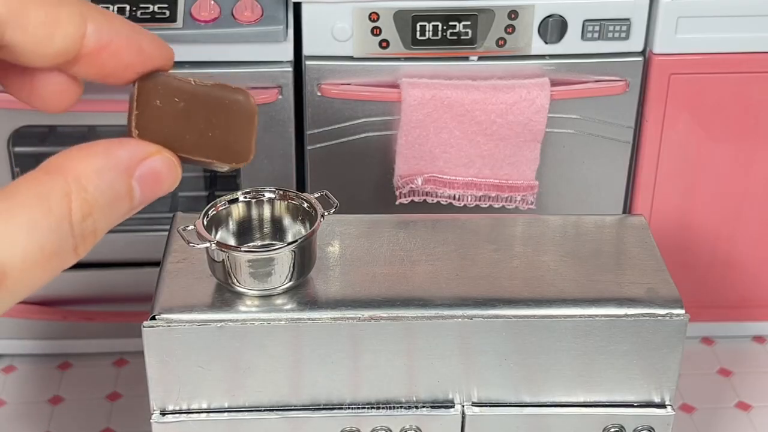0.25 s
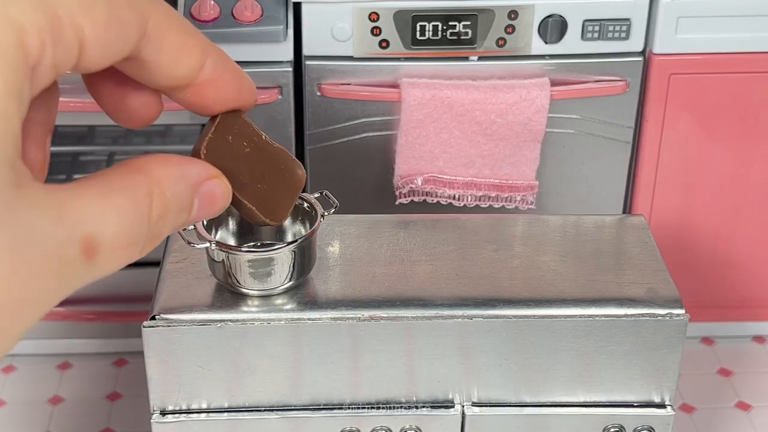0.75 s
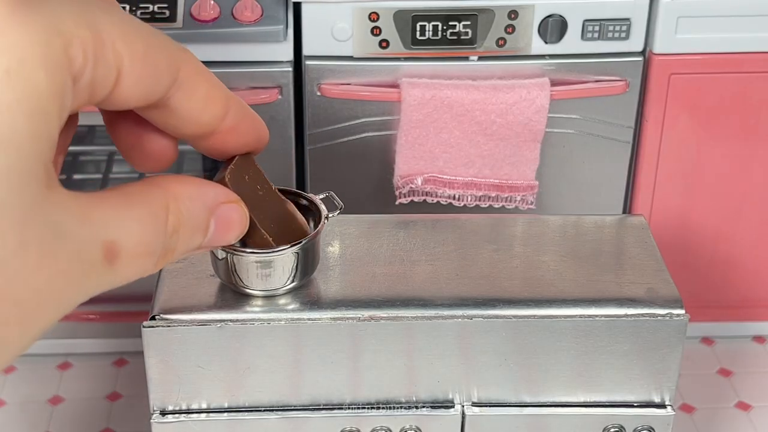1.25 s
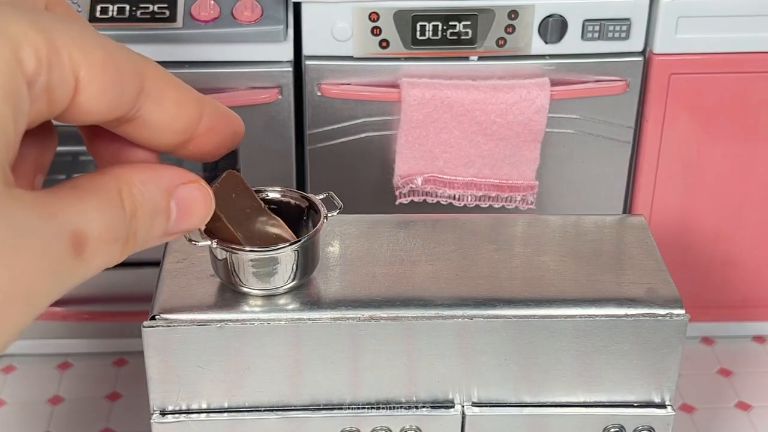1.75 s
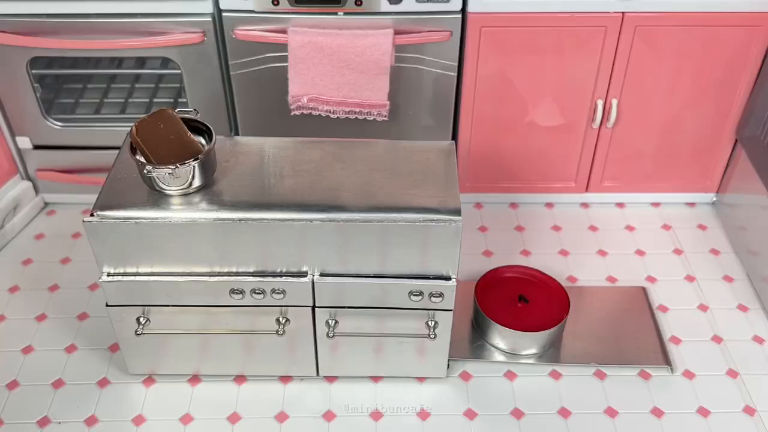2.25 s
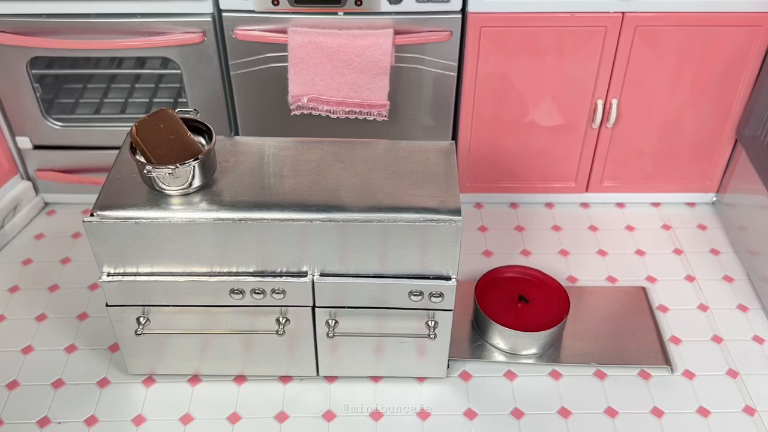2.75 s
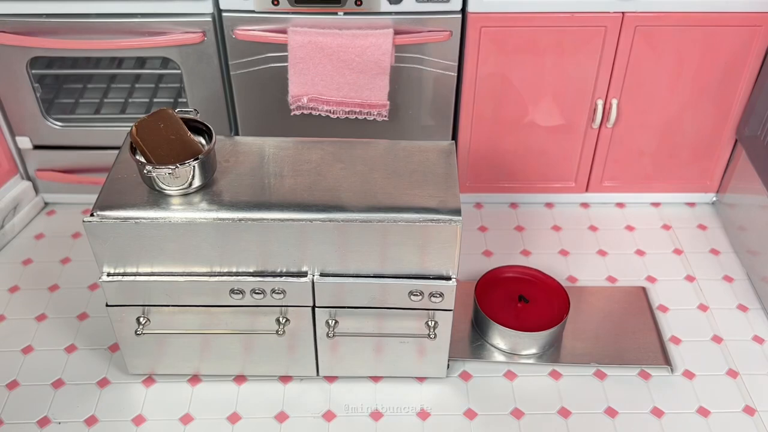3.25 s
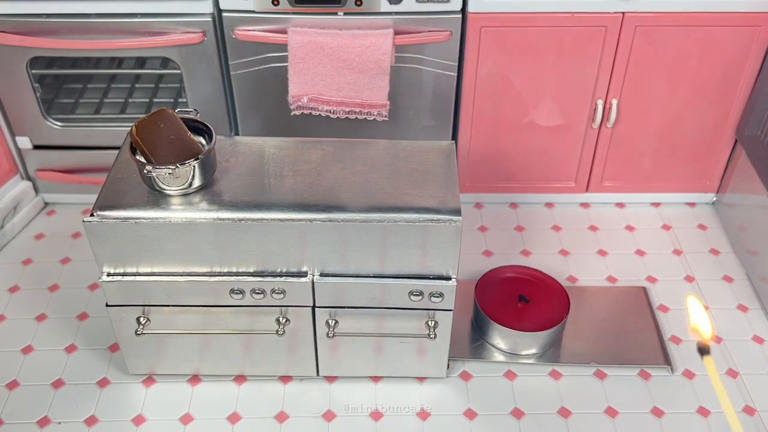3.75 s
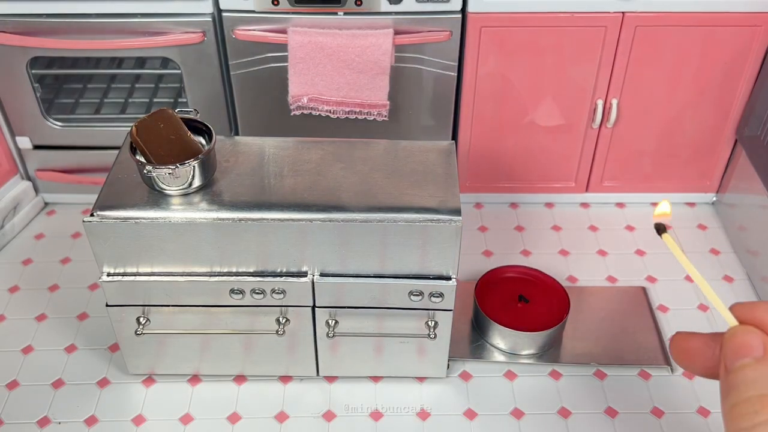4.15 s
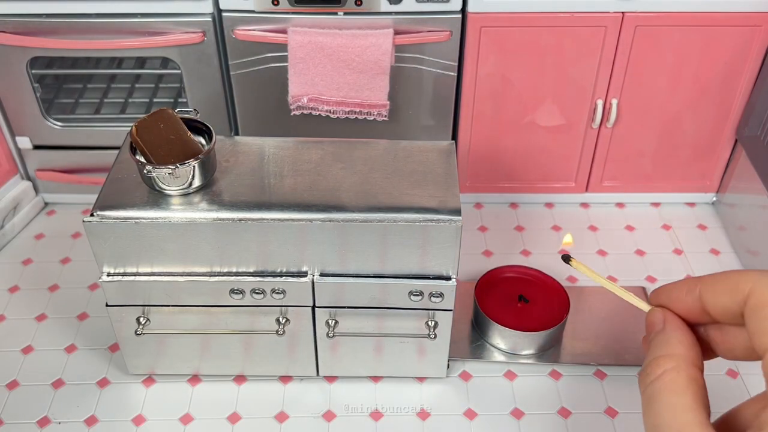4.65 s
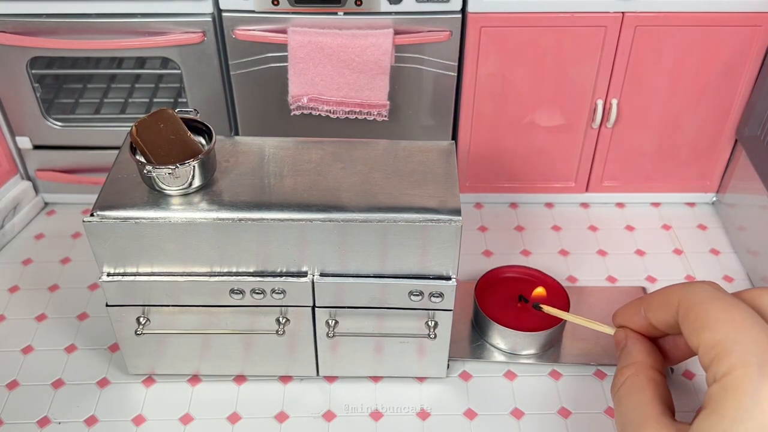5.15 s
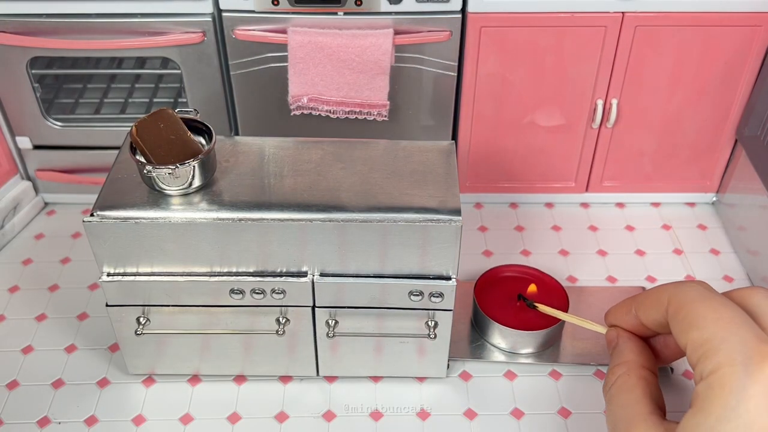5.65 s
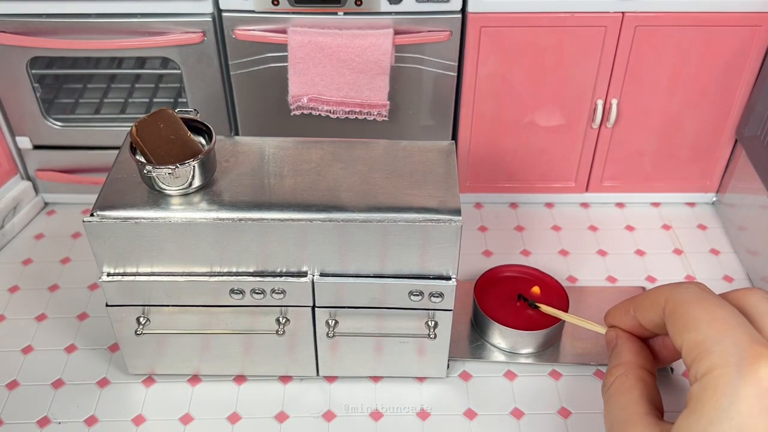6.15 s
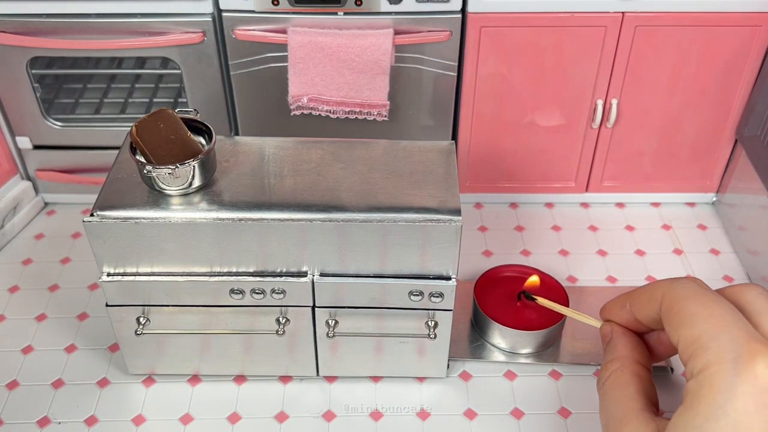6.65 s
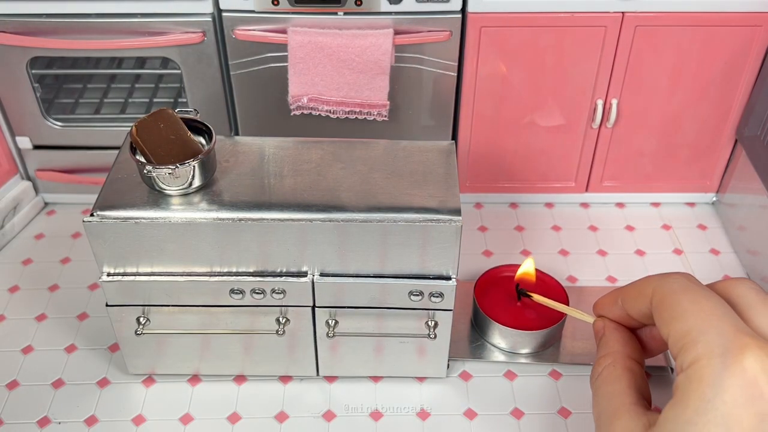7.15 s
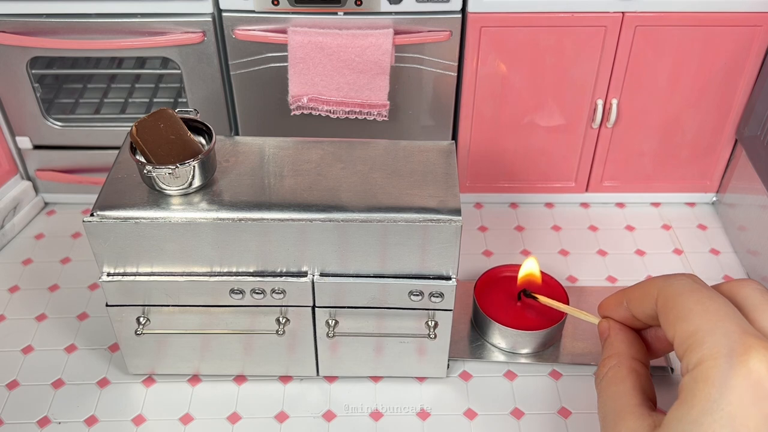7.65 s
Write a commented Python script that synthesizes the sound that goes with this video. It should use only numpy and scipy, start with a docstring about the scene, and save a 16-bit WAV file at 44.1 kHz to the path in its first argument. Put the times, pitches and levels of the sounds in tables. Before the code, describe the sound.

One sharp metallic knock and tiny rattles, faint card rubbing, a loud match strike with spitting flare, two soft thumps, then near-silent flame and sparse ticks.

```python
"""A wooden match is struck, flares with spits and flutter, then burns with a faint hiss and pops: shaped noise
bursts for the catch, grainy noise bands for the flare, flickering bands and filtered clicks for the flame.
Before it, a lump of chocolate drops into a tiny steel pot (decaying modes after noise cracks) and fingers rub a
matchbox (grainy noise that rings the box). Two dull thumps follow the flare. All is close to a two-port
microphone in a quiet room with a low hum and air noise; a thin hiss sits high in the treble."""
import sys
import numpy as np
from scipy import signal
from scipy.fft import rfft, irfft, next_fast_len
from scipy.io import wavfile
from scipy.ndimage import uniform_filter1d, map_coordinates

SR = 44100
rng = np.random.default_rng(int(sys.argv[2]) if len(sys.argv) > 2 else 0)


def unload_wav(signal):
    """Save mono or channel-first audio to the path in sys.argv[1] as 16-bit WAV at rate SR, clipped to [-1, 1]."""
    wavfile.write(
        sys.argv[1],
        SR,
        np.round(np.clip(np.atleast_2d(signal).T, -1, 1) * 32767).astype(np.int16),
    )


N = 347949
T = np.arange(N) / SR

# In the tables level_db is relative; density_db is a relative noise density per Hz.
# Room air spectrum: pitch_hz, density_db
AIR_TONE = [(41, -29), (70, -6), (92, -18), (151, -18.5), (199, -25.5), (255, -28), (540, -37),
            (1020, -42.5), (2900, -51), (6270, -53), (7690, -50.5), (12700, -61), (13900, -72),
            (15900, -64)]
# Difference between the ports in the air noise: pitch_hz, side_minus_mid_db
AIR_SIDE = [(60, -14.5), (110, -14.5), (200, -9), (380, -8), (700, -1.5), (1290, -2), (2380, -7),
            (4400, -13.5), (8120, -13), (15000, 4)]
# Thin top hiss, spectrum: pitch_hz, density_db
TOP_TONE = [(3530, -31.5), (6000, -4), (9200, -1.5), (10100, -18), (11000, -5.5), (12400, -5), (14000, -25),
            (15900, 3)]
# Thin top hiss, course of its level: start_s, level_db
TOP_LEVEL = [(0, -93), (1.85, -92), (2.1, -74.5), (3.5, -81), (7.89, -78.5)]
HUM_HZ, HUM_WIDTH_HZ = 53, 17
HUM_START_DB, HUM_FADE_DB_PER_S, HUM_WAVER_DB, AIR_DB = -45, 0.54, -0.5, -65
ROOM_BALANCE_DB = 0.57  # left minus right

# Difference between the ports for near sources: pitch_hz, side_minus_mid_db
NEAR_SIDE = [(60, -18.5), (200, -16), (380, -7.5), (700, -6.5), (1290, -2.5), (2380, -10), (4400, -8),
             (8120, -8.5), (11000, 0.5), (15000, -3.5)]
# Balance of the ports for near sources: pitch_hz, left_minus_right_db
NEAR_BALANCE = [(60, 1.5), (110, 3), (700, 3.5), (1290, 5), (2380, 3), (4400, 1.5), (8120, 0), (15000, 0)]
ECHO_DB, ECHO_T60_S = -14.5, 0.23
# Treble dips: pitch_hz, width_hz, gain_db
TREBLE_DIPS = [(10190, 2000, -20), (13700, 450, -11.5)]
LOW_HZ, TOP_HZ = 24, 15850
# Bounce of the burning match off the table top: start_s, extra_path_ms, strength (share of direct)
TABLE_ECHO = [(2.85, 1.1, .2), (3.05, 1.1, .5), (3.45, 1.08, .4), (3.9, 1.13, .75), (4.25, 1.1, .75),
              (4.6, .8, .75), (5.0, .61, .5), (7.89, .61, .4)]

# Box and hand set down: start_s, level_db, swell_s, t60_s
THUMPS = [(3.589, -42.5, 0.0055, 0.39), (3.878, -44, 0.0032, 0.42)]
# Thump spectrum: pitch_hz, density_db
THUMP_TONE = [(53, -68), (90, -1.5), (166, 5.5), (348, -19.5), (754, -14), (948, -21), (2090, -26),
              (4010, -38), (4770, -62.5), (6000, -46), (7800, -88)]

# Chocolate on steel: start_s, level_db, ring_db, thud_db, darkness (dB per octave of the crack), rim_db;
# ring, thud and rim are relative to level_db
KNOCKS = [(1.16, -44, -16, -8, 3.5, -30), (1.336, -5.5, -12.5, -17, 0, -43), (1.4395, -43, 3, -8, 0.2, -24),
          (1.463, -35, -10.5, -9, 4.5, -17), (1.4865, -32.5, -4.5, -7, 1, -29),
          (1.4975, -25, -20, -16, 0.5, -12), (1.512, -51.5, 5, 9.5, 4, -40)]
# Crack spectrum: pitch_hz, density_db
CRACK_TONE = [(180, -10.5), (300, -6.5), (786, 0), (1350, -13.5), (3390, -15), (5600, -26.5), (6300, -35),
              (8700, -19), (10300, -25), (11400, -21.5), (15900, -16)]
# Pot modes: pitch_hz, level_db, t60_s
POT_MODES = [(517, -21, 0.2), (617, -13.5, 0.14), (786, -6.5, 0.096), (819, -7.5, 0.13),
             (1177, -17.5, 0.11), (1580, -20, 0.11), (1770, -16, 0.069), (2850, -3, 0.0089),
             (3867, -25, 0.58), (4010, -1.5, 0.011), (4230, -7.5, 0.0087)]
# Hollow tin under the pot: pitch_hz, level_db, t60_s
TIN_MODES = [(134, 4.5, 0.074), (155, -2.5, 0.15)]
RIM_HZ, RIM_T60_S = 5440, .013
REBOUND_S = .00175  # light touches land twice
SOFT_DB_PER_DB = .5  # a weaker blow is a longer, duller contact
SETTLE_T60_S = 0.13  # extra damping after the last knock

# Finger slides: start_s, length_s, first_db, last_db, bright_share (0-1)
SLIDES = [(2.06, 0.015, -53, -51.5, 0), (2.078, 0.014, -54, -48, 0.27), (2.094, 0.0073, -51, -44.5, 0),
          (2.113, 0.041, -45, -57.5, 0.16), (2.231, 0.069, -67.5, -59, 0.67),
          (2.274, 0.0021, -44, -36, 0.9), (2.288, 0.042, -44, -38, 1), (5.464, 0.044, -61.5, -67, 0.2),
          (6.109, 0.037, -64, -62, 0.16)]
# Dull slide spectrum: pitch_hz, density_db
DULL_TONE = [(150, -59), (250, -29), (437, 0), (933, 1), (1390, -23), (1670, -38), (2500, -11), (3100, -24),
             (6000, -29), (7800, -66)]
# Bright slide spectrum: pitch_hz, density_db
BRIGHT_TONE = [(240, -42), (400, -16), (864, -23), (1250, -8), (1560, -15), (2500, -13.5), (3460, -14.5),
               (7590, -21.5), (8580, -6), (10200, -34), (15900, -21)]
# Hollow card box: pitch_hz, level_db, t60_s
BOX_MODES = [(1480, 0, .05), (1650, -3, .04), (2110, -3, .045), (3440, -10, .025), (4400, -10, .02),
             (8320, -6, .015)]
BOX_DB = 3.5  # box ring relative to the bright hiss
SLIDE_ATTACK_S, SLIDE_T60_S = .003, 0.14  # decay of a long slip

# Match head catches on the strip: start_s, level_db, swell_s, t60_s, darkness (dB per octave)
CATCHES = [(2.675, -18.5, 0.009, 0.066, 3), (2.6864, -8, .0004, .012, -1), (2.695, 9.5, 0.0024, 0.014, -1),
           (2.7038, 8, .004, .035, -1), (2.716, -4, .001, 0.036, 3), (2.725, -12.5, 0.0065, 0.081, 4),
           (2.7463, -2, .0015, .03, 2.5), (2.797, -18.5, .0008, .02, 1.5), (2.804, -16, .0015, .04, -1.5),
           (2.817, -24, .002, .04, 2)]
# Strike spectrum: pitch_hz, density_db
STRIKE_TONE = [(35, -33.5), (60, -14.5), (249, -9), (502, -15.5), (1220, -2.5), (1610, -14), (2130, -4),
               (3570, -13.5), (3830, -8), (5560, -15.5), (8070, -5), (9960, -17.5), (12000, -15.5),
               (13800, -22), (15900, -13.5)]
# The table top gives under the stroke: pitch_hz, level_db, t60_s
TABLE_MODES = [(62, -27, .2), (107, -29.5, .15)]
PUSH_S = 2.703

# The head burns off: start_s, rush_db
FLARE = [(2.688, -26), (2.76, -22.5), (2.82, -36.5), (2.855, -43), (2.88, -38.5), (3.15, -35), (3.19, -41),
         (3.33, -42.5), (3.39, -42), (3.45, -46), (3.468, -78)]
# Flare spectrum: pitch_hz, density_db
FLARE_TONE = [(150, -34.5), (250, -6.5), (1210, -12.5), (1520, -8.5), (2200, -15.5), (2750, -9),
              (4390, -15), (8360, -8.5), (10300, -15), (10800, -15), (12700, -24), (13600, -33.5),
              (14600, -18), (15900, -18)]
# Grains of the head spit: start_s, level_db, darkness (dB per octave), puff_db
SPITS = [(2.861, -12, 0, -46.5), (2.872, -15.5, 1, -54), (2.887, -18, 4, -32), (2.908, -21.5, 2.5, -44.5),
         (2.919, -18, 2, -43), (2.942, -15.5, 4, -22.5), (2.955, -21, -0.5, -46), (2.963, -21, -1.5, -47),
         (2.974, -13, 0, -53.5), (2.997, -20, 0.5, -58), (3.02, -20, -0.5, -37)]
# Coarse grains burn in spells: start_s, length_s, first_db, last_db
SPUTTERS = [(2.699, 0.11, -35.5, -30), (2.861, .075, -31.5, -35.5)]
# The flame front flaps: start_s, length_s, first_db, last_db
FLUTTERS = [(2.669, .03, -45, -41.5), (2.967, 0.17, -46, -45.5), (3.197, 0.19, -45.5, -44.5),
            (3.361, 0.025, -36.5, -40)]
SPIT_T60_S, SPUTTER_T60_S, FLUTTER_T60_S = 0.0154, .12, 0.35
PUFF_HZ, PUFF_FALL_S, PUFF_T60_S = 649.8, 0.0027, 0.039  # starting pitch, time to halve it, decay
PATCHY_DB, PATCHES_PER_S = 2.2, 10

# Flame hiss spectrum: pitch_hz, density_db
FLAME_TONE = [(3200, -48), (4600, -5.5), (6500, -3.5), (9300, 5.5), (12000, -1.5), (15800, -5)]
HISS_DB, LOWER_HISS_DB, CUP_DB, FLAME_FROM_S = -75.5, -90.5, -83.5, 3.7
# The flame hisses louder for a while: start_s, length_s, hiss_db, lower_hiss_db, cup_db
FLAME_SWELLS = [(3.964, 0.23, -79.5, -70.5, -74), (4.249, 0.59, -84, -88, -100),
                (5.1, 0.36, -78.5, -81, -78), (7.066, 0.44, -82, -91, -74), (7.72, .2, -81, -90, -78.5)]
SWELL_ATTACK_S, SWELL_T60_S = 0.1, 0.56
# Resonances of the candle cup: pitch_hz, width_hz
CUP_BANDS = [(4950, 450), (6400, 750)]
CUP_WANDER = .012  # share of the pitch
# Wood and wick pop: start_s, level_db, darkness (dB per octave), knock_db, hollow_hz
POPS = [(4.1842, -49.5, 5.5, -76, 6000), (5.0725, -54.5, 1, -83, 3600), (5.083, -41, 4.5, -71, 3310),
        (5.494, -49, -7.5, -71, 2986), (5.5598, -22, -2.5, -51.5, 3880), (6.0542, -34.5, -0.5, -48, 5430),
        (6.14, -54.5, 7.5, -63, 3998), (7.0808, -49.5, 5, -79, 3496), (7.4584, -37.5, -2, -60, 2606)]
# Pop spectrum: pitch_hz, density_db
POP_TONE = [(900, -27), (1400, -12), (1950, -11), (2250, 2), (2700, -4), (4340, -3.5), (6500, -2.5),
            (9190, -1.5), (11200, -7.5), (15900, -17.5)]


def undb(db):
    """Decibel law: amplitude ratio of a level."""
    return 10 ** (np.asarray(db) / 20)


def unit(x):
    """Normalization to an RMS of one."""
    return x / np.sqrt(np.mean(x ** 2))


def noise():
    """White noise: equal mean power at all frequencies."""
    return rng.standard_normal(N)


def gain_at(hz, tone):
    """Frequency response: points in dB joined on a log-frequency axis."""
    at, db = np.transpose(tone)
    return undb(np.interp(np.log(hz + 1), np.log(at), db))


def colour(x, tone, size=4096):
    """Minimum-phase filtering: the cepstrum folded to make the response causal."""
    cepstrum = irfft(np.log(gain_at(np.fft.rfftfreq(size, 1 / SR), tone)))
    cepstrum[1:size // 2] *= 2
    cepstrum[size // 2 + 1:] = 0
    impulse_response = irfft(np.exp(rfft(cepstrum)))
    return signal.oaconvolve(x, impulse_response)[:len(x)]


def hiss(tone):
    """Coloured noise of RMS one."""
    return unit(colour(noise(), tone))


def curve(table):
    """Level envelope: linear in dB between points, silent outside them."""
    rows = np.array(table)
    return undb(np.interp(T, rows[:, 0], rows[:, 1], -200, -200))


def walk(rate):
    """Random modulation: levels drawn every 1 / rate s, joined by ramps, RMS one."""
    k = int(SR / rate)
    steps = np.repeat(rng.standard_normal(N // k + 1), k)
    return unit(uniform_filter1d(steps, k)[:N])


def spell(s, length, first_db, last_db, attack, t60):
    """Level envelope: rises until s, glides in dB over its length, then decays exponentially."""
    db = np.interp(T, [s, s + length], [first_db, last_db])
    db = db - 60 * np.maximum(T - s - length, 0) / t60
    return undb(db) * np.clip((T - s) / attack + 1, 0, 1) ** 2


def add(out, s, piece):
    """Superposition of a piece that starts at s."""
    i = int(s * SR)
    out[i:i + len(piece)] += piece[:len(out) - i]


def burst(source, s, db, swell, t60, dark_db=0.):
    """Transient: a stretch of source swells, decays exponentially and is tilted about 3 kHz."""
    t = np.arange(int((t60 + 4 * swell) * SR)) / SR
    shape = (1 - np.exp(-t / swell)) ** 2 * undb(-60 * t / t60)
    piece = source[int(s * SR):][:len(t)] * shape[:N - int(s * SR)] / shape.max()
    return undb(db) * colour(piece, [(375, 3 * dark_db), (12000, -2 * dark_db)], size=256)


def ring(modes):
    """Modal vibration: damped sinusoids with a fresh strength at every blow."""
    t = np.arange(SR // 2) / SR
    chance = rng.standard_normal(len(modes))
    return sum(undb(db + 0.45 * c - 60 * t / t60) * np.sin(2 * np.pi * hz * t)
               for (hz, db, t60), c in zip(modes, chance))


def room():
    """Ambient field: a coherent wavering, fading hum under less coherent air noise; over it sounds a thin top
    hiss that grows louder around 2 s."""
    hum = signal.lfilter(*signal.iirpeak(HUM_HZ, HUM_HZ / HUM_WIDTH_HZ, fs=SR), noise())
    hum = unit(colour(hum, [(24, -25.0), (44, 3.0), (62, 0.5), (95, -21.0)]))
    hum = hum * undb(HUM_START_DB - HUM_FADE_DB_PER_S * T + HUM_WAVER_DB * walk(4.7))
    air = colour(noise(), AIR_TONE)
    side = colour(colour(noise(), AIR_TONE), AIR_SIDE)
    # AIR_DB is the level between 200 and 1500 Hz
    air_band = signal.sosfilt(signal.butter(4, (200, 1500), "band", fs=SR, output="sos"), air)
    gain = undb(AIR_DB) / air_band.std()
    top = curve(TOP_LEVEL) * np.array([hiss(TOP_TONE), hiss(TOP_TONE)])
    balance = undb([[ROOM_BALANCE_DB / 2], [-ROOM_BALANCE_DB / 2]])
    return (hum + gain * np.array([air + side, air - side]) + top) * balance


def place(near):
    """Reverberation and port differences: a decaying tail, scattered early reflections, level and phase."""
    t = np.arange(int(ECHO_T60_S * SR)) / SR
    tails = rng.standard_normal((2, len(t))) * undb(-60 * t / ECHO_T60_S) * (t > .006)
    tails = undb(ECHO_DB) * tails / np.linalg.norm(tails[0])
    early = rng.standard_normal(len(t)) * undb(-60 * t / .09)
    scattered = undb(-3.5) * signal.oaconvolve(near, early / np.linalg.norm(early))[:N]
    size = next_fast_len(N)
    hz, spectrum = np.fft.rfftfreq(size, 1 / SR), rfft(near, size)
    # a quarter-cycle shifted difference makes the left port lead without making it louder
    side = gain_at(hz, NEAR_SIDE) * (.65j * spectrum + rfft(scattered, size))
    balance = np.sqrt(gain_at(hz, NEAR_BALANCE))
    dull = colour(near, [(500, 2.5), (10000, -8.0)])
    left = irfft(spectrum * balance + side, size)[:N] + signal.oaconvolve(dull, tails[0])[:N]
    right = irfft(spectrum / balance - side, size)[:N] + signal.oaconvolve(dull, tails[1])[:N]
    return np.array([left, right])


def thumps():
    """Frequency-dependent damping: dull blows whose treble dies first."""
    out, body = np.zeros(N), hiss(THUMP_TONE)
    for s, db, swell, t60 in THUMPS:
        add(out, s, burst(body, s, db, swell, t60, 0.58))
        add(out, s, burst(body, s, db, swell, 0.3 * t60, -4.5))
    return out


def pot():
    """Impact excitation: a crack, the pot's modes, a rattle that re-excites them and a thud of the tin."""
    out, rings, crack = np.zeros(N), np.zeros(N), hiss(CRACK_TONE)
    for s, db, ring_db, thud_db, dark_db, rim_db in KNOCKS:
        # a weaker blow has a longer contact and less treble
        soft_db = SOFT_DB_PER_DB * db
        mode_tilt = [(500, 1.2 * dark_db), (5700, -1.1 * dark_db), (6600, soft_db)]
        modes = undb(db + ring_db) * colour(ring(POT_MODES), mode_tilt, size=256)
        tick = burst(crack, s, db - 12.0, 0.0001 / undb(soft_db), 0.022, dark_db)
        add(out, s, colour(tick, [(5700, 0), (6600, soft_db)], size=256))
        add(out, s, burst(crack, s, db - 34.5, 0.0026, 0.24, dark_db + 1.5))
        add(rings, s, undb(db) * ring([(RIM_HZ, rim_db, RIM_T60_S)]))
        add(rings, s, modes)
        add(rings, s + REBOUND_S, (1 - undb(soft_db)) ** 2 * modes)
        rattle = burst(noise(), s, -39.0, 0.00087, 0.081)
        add(rings, s, signal.oaconvolve(modes, rattle))
        add(out, s + 0.01003, undb(db + thud_db) * ring(TIN_MODES))
    last = int(KNOCKS[-1][0] * SR)
    rings[last:] *= undb(-60 * T[:N - last] / SETTLE_T60_S)
    return out + rings


def slides():
    """Stick-slip friction: skin on card hisses in uneven grains; bright slips ring the box and linger low."""
    grain = unit(undb(2.8 * walk(200) + .8 * walk(45)))
    dull, bright, out = hiss(DULL_TONE), hiss(BRIGHT_TONE), np.zeros(N)
    box = unit(signal.oaconvolve(noise(), ring(BOX_MODES))[:N])
    bright = unit(bright + undb(BOX_DB) * box)
    linger = hiss([(1100, -30.5), (1450, 0.5), (1600, -0.5), (2100, -9), (2500, -31)])
    for s, length, first_db, last_db, share in SLIDES:
        t60 = SLIDE_T60_S * min(length / 0.043, 1)  # a short slip stops short
        rub = grain * (share * bright + (1 - share) * dull)
        out += spell(s, length, first_db, last_db, SLIDE_ATTACK_S, t60) * rub
        out += spell(s, length, first_db, last_db, 0.023, 2.2 * t60) * share * undb(-10.5) * linger
    return out


def off_table(x):
    """Comb interference: direct sound plus a band-limited table bounce whose delay drifts and wavers."""
    s, ms, share = np.transpose(TABLE_ECHO)
    lag = np.interp(T, s, ms) * SR / 1000
    bounce = colour(x, [(1500, -14), (2500, 0), (8000, 0), (12000, -8)])
    delayed = map_coordinates(bounce, [np.arange(N) - lag * (1 + .02 * walk(7))], order=1)
    return unit(x + np.interp(T, s, share) * delayed)


def strike():
    """Friction in jerks: the head catches on the grit in rough noise bursts and pushes the table top."""
    out, grit = np.zeros(N), hiss(STRIKE_TONE) * undb(1.5 * walk(700))
    for s, db, swell, t60, dark_db in CATCHES:
        add(out, s, burst(grit, s, db - 10.0, swell, t60, dark_db))
    add(out, PUSH_S, ring(TABLE_MODES))
    return out


def puff():
    """Falling tone: a puff of gas whose pitch drops as it dies away."""
    t = np.arange(int(PUFF_T60_S * SR)) / SR
    hz = PUFF_HZ / (1 + t / PUFF_FALL_S)
    return np.sin(2 * np.pi * np.cumsum(hz) / SR) * undb(-60 * t / PUFF_T60_S)


def patchy(x):
    """Independent band modulation: 300 Hz bands in sixteen groups, each with its own flicker."""
    size = next_fast_len(N)
    hz, spectrum = np.fft.rfftfreq(size, 1 / SR), rfft(x, size)
    group = hz // 300 % 16
    return unit(sum(irfft(spectrum * (group == k), size)[:N] * undb(PATCHY_DB * walk(PATCHES_PER_S))
                    for k in range(16)))


def flare():
    """Turbulent combustion noise: a crackling gas rush, lower sputter, flutter of the front and spits."""
    crackle = noise() * undb(2 * np.minimum(rng.exponential(size=N), 5))
    gas = off_table(colour(crackle, FLARE_TONE))
    rush = patchy(gas) * undb(1.1 * walk(60) + .5 * walk(15))
    sputter = hiss([(250, -20), (600, 0), (2400, -3), (4000, -25)])
    sputter = unit(sputter * undb(5 * np.tanh(walk(300))))
    flutter = hiss([(45, -2), (95, -4), (150, -1.0), (260, -7.0), (600, -29.5)]) * undb(2.5 * walk(25))
    out = curve(FLARE) * rush
    out += sum(spell(*row, .004, SPUTTER_T60_S) for row in SPUTTERS) * sputter
    out += sum(spell(*row, .015, FLUTTER_T60_S) for row in FLUTTERS) * flutter
    for s, db, dark_db, puff_db in SPITS:
        add(out, s, undb(puff_db) * puff())
        add(out, s, burst(gas, s, db - 10.0, 0.0003, SPIT_T60_S, dark_db))
    return out


def whistle(hz, width_hz):
    """Narrow-band noise: slow complex noise shifted up to a wandering centre, with a fluctuating level."""
    slow = signal.lfilter(*signal.butter(2, width_hz / SR), noise() + 1j * noise())
    phase = 2 * np.pi * np.cumsum(hz * (1 + CUP_WANDER * walk(14.0))) / SR
    return unit((slow * np.exp(1j * phase)).real) * undb(3.1 * walk(19))


def click(db, dark_db, hollow_hz):
    """Impulse through a notch filter: a snap, tilted about 3 kHz, with a hollow around hollow_hz."""
    tick = np.zeros(1024)
    tick[0] = 1
    tick = colour(tick, POP_TONE, size=512)
    tick = colour(tick, [(375, 3 * dark_db), (12000, -2 * dark_db)], size=256)
    tick = tick - .95 * signal.lfilter(*signal.iirpeak(hollow_hz, 3.5, fs=SR), tick)
    return undb(db) * tick / np.abs(tick).max()


def flame():
    """Weak combustion noise: a flickering hiss and cup ring; pops snap, fizz and knock the stick."""
    lower = hiss([(1200, -19.0), (2000, 6.5), (4300, 1.5), (5800, -8)])
    cup = unit(sum(whistle(*band) for band in CUP_BANDS))
    gains = np.outer(undb([HISS_DB, LOWER_HISS_DB, CUP_DB]), T > FLAME_FROM_S)
    for s, length, *db in FLAME_SWELLS:
        gains += np.outer(undb(db), spell(s, length, 0, 0, SWELL_ATTACK_S, SWELL_T60_S))
    out = gains[0] * off_table(hiss(FLAME_TONE)) + gains[1] * off_table(lower)
    out = out * undb(0.6 * walk(9.6)) + gains[2] * cup
    snap = off_table(hiss(POP_TONE))
    knock = hiss([(120, -4.5), (290, 0.5), (600, -5.5), (850, -3.5), (1300, -25.0)])
    for s, db, dark_db, knock_db, hollow_hz in POPS:
        add(out, s, click(db + 5, dark_db, hollow_hz))
        add(out, s, burst(snap, s, db - 15, .0007, .01, dark_db))
        add(out, s, burst(snap, s, db - 35, 0.0035, 0.21, dark_db + 1.0))  # fizz
        add(out, s, burst(knock, s, knock_db, 0.0019, 0.091))
    return out


def scene():
    """Superposition: the near sources placed in the room, over its ambient field."""
    near = thumps() + pot() + slides() + strike() + flare() + flame()
    return room() + place(near)


def record(dry):
    """Band limiting and clipping: two treble dips, a bass cut, clipped peaks, a top cut."""
    for hz, width_hz, db in TREBLE_DIPS:
        dry = dry - (1 - undb(db)) * signal.lfilter(*signal.iirpeak(hz, hz / width_hz, fs=SR), dry)
    dry = signal.sosfilt(signal.butter(3, LOW_HZ, "high", fs=SR, output="sos"), dry)
    clipped = np.clip(dry, -.9, .9)
    return signal.sosfilt(signal.ellip(12, .2, 80, TOP_HZ, fs=SR, output="sos"), clipped)


dry = scene()
out = record(dry)
unload_wav(out)
```